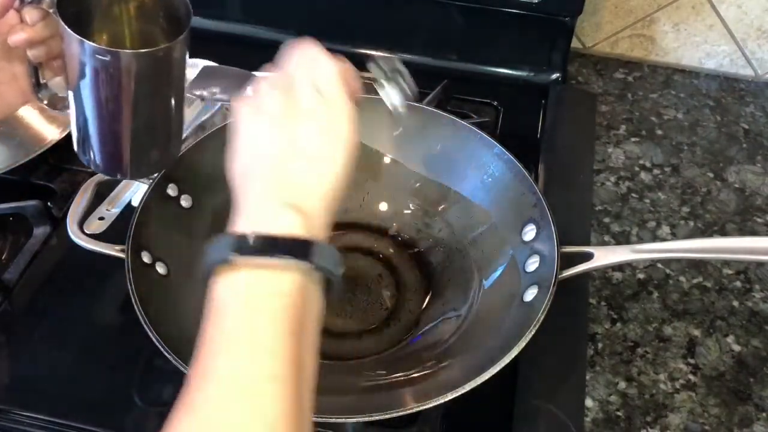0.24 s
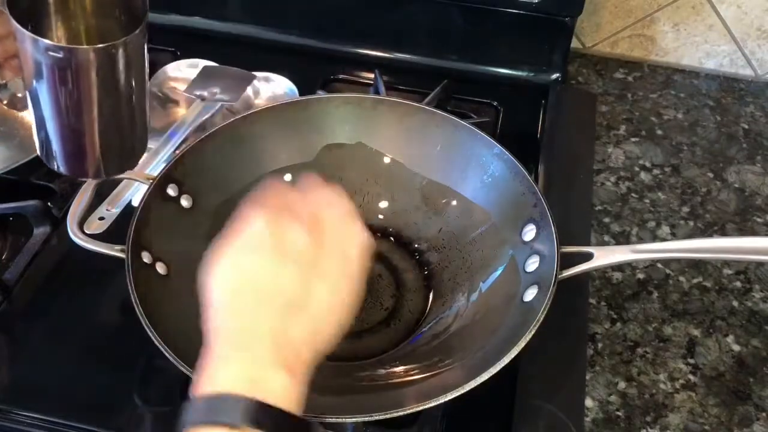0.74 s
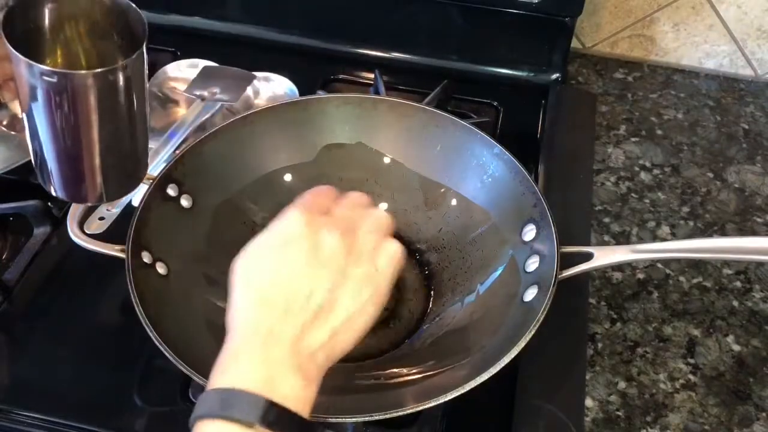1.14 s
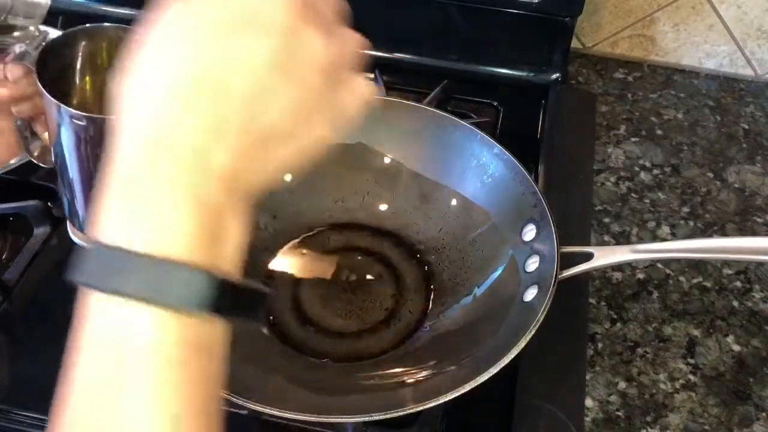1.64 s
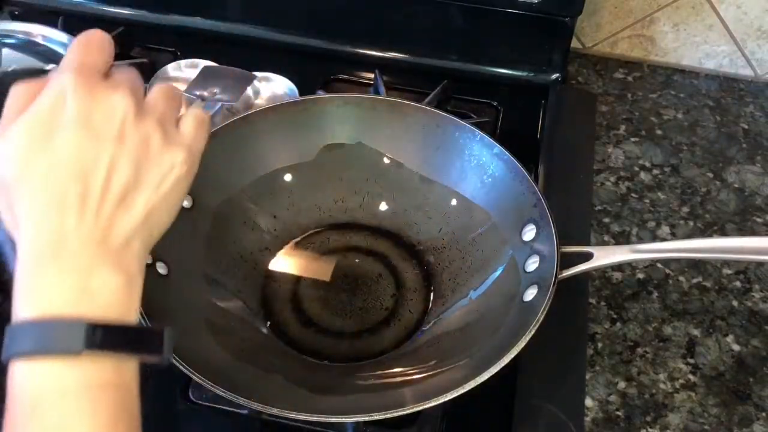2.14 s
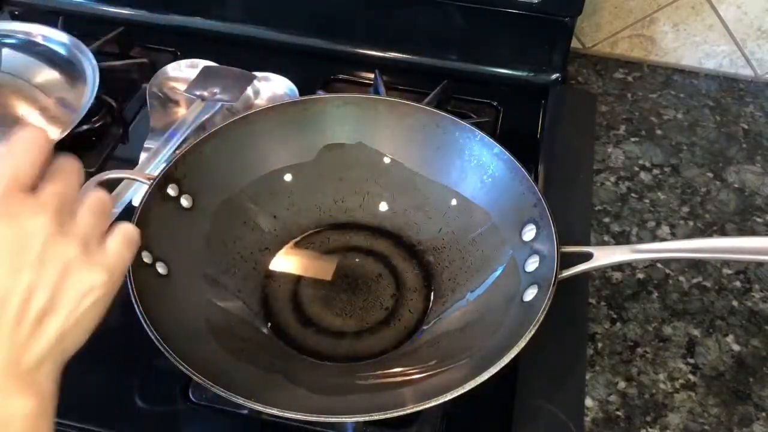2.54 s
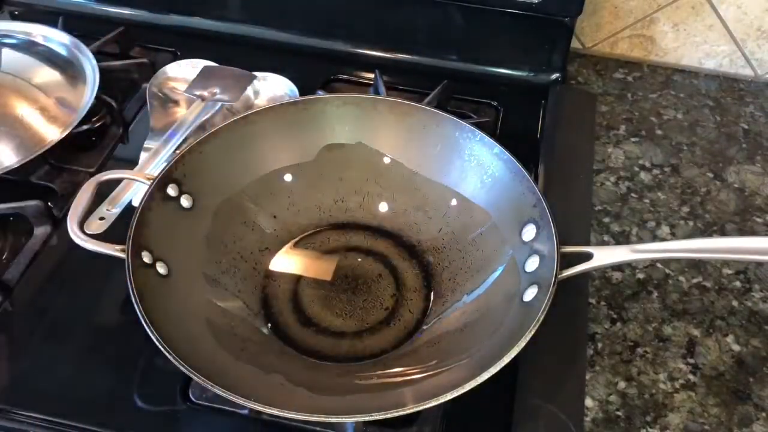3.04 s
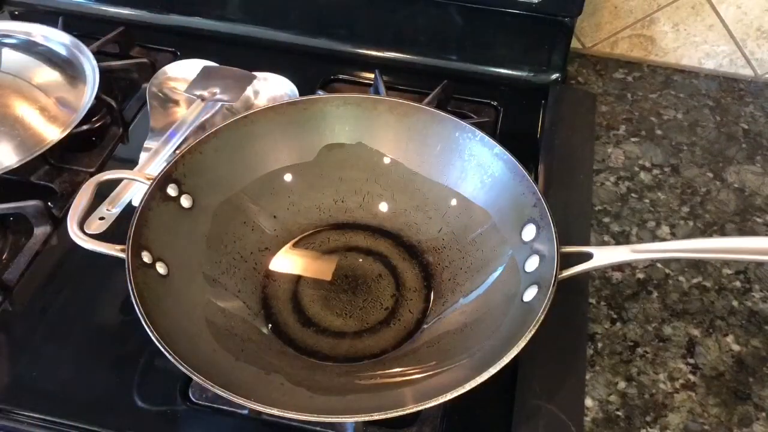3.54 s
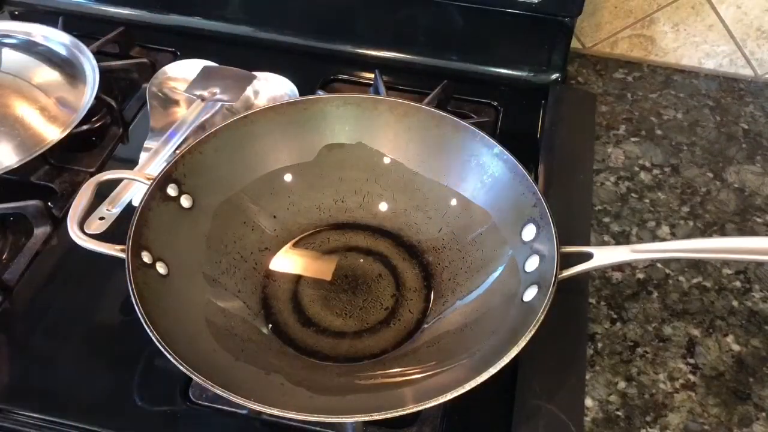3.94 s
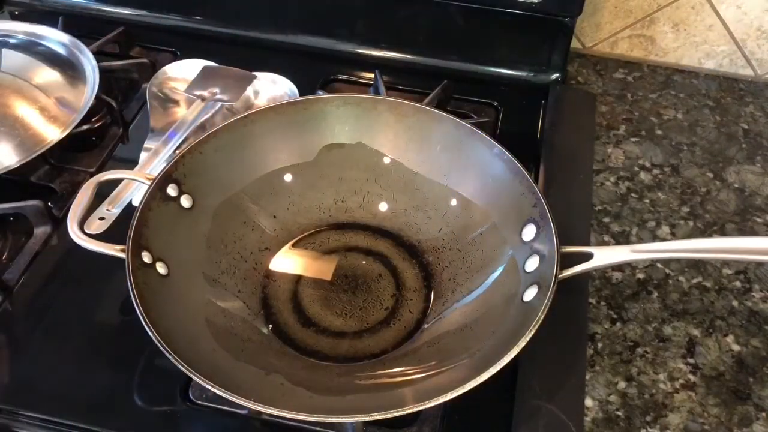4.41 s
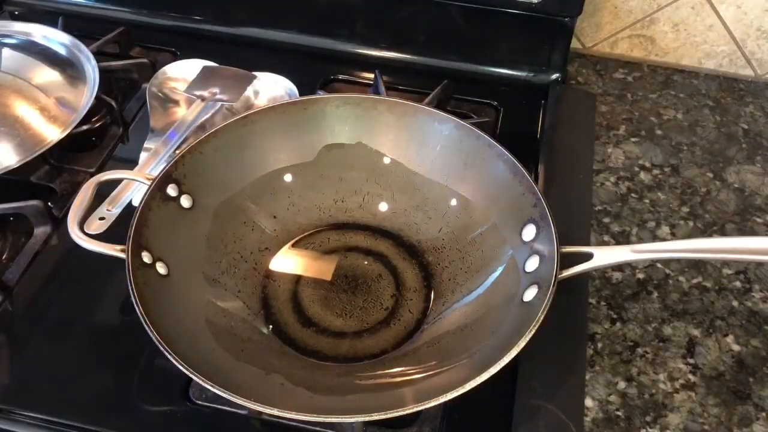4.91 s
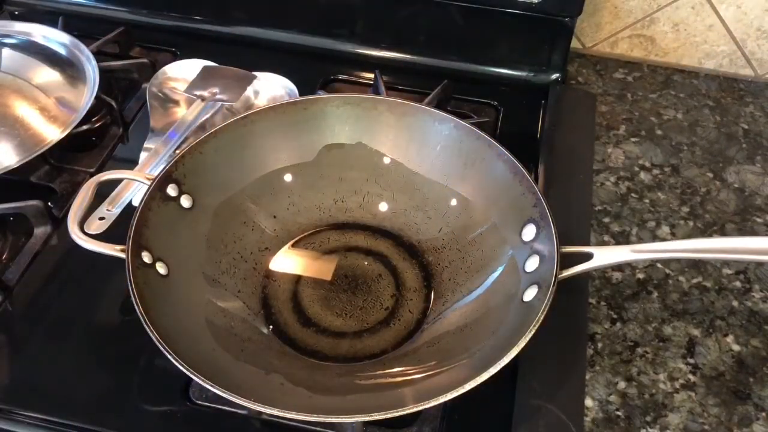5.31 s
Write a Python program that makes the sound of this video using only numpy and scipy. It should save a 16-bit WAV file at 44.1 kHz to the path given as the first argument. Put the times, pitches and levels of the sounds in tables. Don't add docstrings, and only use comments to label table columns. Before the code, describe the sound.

From 0 to 2.4 s there is only a quiet kitchen: low rumble, a wavering motor hum around 85 Hz creeping slightly upward, a steady mains buzz, faint electronic whine and soft hiss. At 2.42 s a steel base lightly touches the stove and scrapes with brief singing tones. At 2.52 s it lands hard, a damped clank with a hollow stove-top knock, and at 2.54 s bounces with the loudest, brightest clang, ringing about half a second. Soft rubbing and small clicks come near 2.9 s. At 3.18 s a second, weaker clink with quick rebounds rings, followed by scraping. At 3.5 s a light spoon tap; from 3.67 to 4.0 s dry, choked rattles and dull rubs. Faint metallic hisses fade through 4.3-4.7 s. A sharp tiny tick at 4.81 s, a soft double tick at 5.33 s and a last at 5.5 s close over the hum. Close mono microphone, short tail.

```python
import sys
import numpy as np
from scipy import signal
from scipy.fft import rfft, irfft, next_fast_len
from scipy.io import wavfile
from scipy.ndimage import map_coordinates

SR = 44100
rng = np.random.default_rng(int(sys.argv[2]) if len(sys.argv) > 2 else 0)


def wav_out(sig):
    wavfile.write(sys.argv[1], SR, np.round(np.clip(np.atleast_2d(sig).T, -1, 1) * 32767).astype(np.int16))


def to_linear_factor(level_db):
    exponent = np.asarray(level_db, float) / 20
    return 10 ** exponent


N = 245637


def unit(x):
    return x / np.sqrt(np.mean(x ** 2) + 1e-20)


def along(points, hz):
    point_hz, value = np.transpose(points)
    return np.interp(np.log(hz + 1), np.log(point_hz + 1), value)


def wobble(rate):
    knots = rng.standard_normal(int(N * rate / SR) + 4)
    return map_coordinates(knots, [np.arange(N) * rate / SR])


def filtered(x, gain):
    size = next_fast_len(x.shape[-1])
    spectrum = rfft(x, size) * gain(np.fft.rfftfreq(size, 1 / SR))
    return irfft(spectrum, size)[..., :x.shape[-1]]


def noise(gain):
    return unit(filtered(rng.standard_normal(N), gain))


def humps(peaks, f):
    power = 0
    for hz, width, db in peaks:
        power = power + to_linear_factor(db) ** 2 / width / (1 + (2 * (f - hz) / width) ** 2) ** 2
    return np.sqrt(power)


def narrow(peaks):
    total = np.linalg.norm(to_linear_factor([db for _, _, db in peaks]))
    return total * noise(lambda f: humps(peaks, f))


def hump(t, crest, rise, fall):
    return np.sin(np.pi / 2 * np.interp(t, [crest - rise, crest, crest + fall], [0, 1, 0])) ** 2


def swells(rows, column):
    t = np.arange(N) / SR
    return sum(to_linear_factor(row[column]) * hump(t, *row[:3]) for row in rows)


def dying(gain, t60_of, size):
    hz, t, z = signal.stft(rng.standard_normal(size), SR, nperseg=256, noverlap=192)
    hz = hz[:, None] + 1
    fading = z * gain(hz) * to_linear_factor(-60 * t / t60_of(hz))
    tail = signal.istft(fading, SR, nperseg=256, noverlap=192)[1][:size]
    return tail / np.linalg.norm(tail)


# crest in seconds, rise in seconds, fall in seconds, level in dB.
MOTOR_SWELLS = [
    (0.01, .3, 0.77, -69.5),
    (1.1, 0.6, 0.3, -68),
    (1.85, 0.37, 0.27, -65),
    (2.8, 1.8, 0.74, -67.5),
    (5.1, 0.73, 0.95, -69.5),
]


def motor():
    start_hz, climb_hz, creep_power = 84, 11, 1.5
    steady_db = -89
    pitch = start_hz + climb_hz * (np.arange(N) / N) ** creep_power + 3.64 * wobble(10)
    level = (to_linear_factor(steady_db) + swells(MOTOR_SWELLS, column=3)) * to_linear_factor(1.6 * wobble(7.2))
    return np.sqrt(2) * level * np.sin(2 * np.pi * np.cumsum(pitch) / SR)


# pitch in Hz, width in Hz, level in dB.
BUZZ = [(57.4, 5, -74), (130.5, 12, -78), (239.4, 5.3, -75), (385, 81, -86)]
# pitch in Hz, width in Hz, level in dB.
WHINE = [(2930, 98, -87), (3267, 170, -88), (4060, 220, -88.5), (4310, 160, -87), (4600, 37, -90.5),
         (7900, 130, -101), (8910, 110, -88), (13880, 310, -90)]


def electric():
    mains_hz, mains_db = 360.3, -73
    level = to_linear_factor(mains_db + 0.99 * wobble(2.75))
    mains = np.sqrt(2) * level * np.sin(2 * np.pi * mains_hz * np.arange(N) / SR)
    return mains + narrow(BUZZ) + narrow(WHINE)


# frequency in Hz, level in dB per Hz.
AIR = [(15, -63), (25, -27), (39, -14.5), (84, -0.5), (113, -9), (206, -10.5), (236, -9), (327, -11),
       (362, -11), (388, -11.5), (415, -11), (1500, -33), (1950, -31.5), (3300, -120)]
# frequency in Hz, level in dB per Hz.
HISS = [(500, -2), (1200, -3.5), (2500, -5.5), (5000, -10.5), (8500, -12), (9500, -15), (12000, -17),
        (13200, -13.5), (15700, -15.5)]
# crest in seconds, rise in seconds, fall in seconds, level in dB.
STIR = [
    (3.3, 1.7, 2.6, -82.5),
    (5.57, 0.27, .45, -83),
]


def kitchen_air():
    rumble_db, sway_db, hiss_db = -63.05, 0.8, -71.5
    rumble = to_linear_factor(rumble_db + sway_db * wobble(3.27)) * noise(lambda f: to_linear_factor(along(AIR, f)))
    hiss = (to_linear_factor(hiss_db) + swells(STIR, column=3)) * noise(lambda f: to_linear_factor(along(HISS, f)))
    return rumble + hiss + motor() + electric()


BASE_HZ = [2230, 2355, 3470, 4290, 5535, 7545, 8250, 9200, 11250, 12120, 13030, 15280]
# crest in seconds, rise in seconds, fall in seconds, dull rub in dB, bright rub in dB.
SLIDES = [(2.435, 0.0177, 0.06, -75, -64), (2.507, 0.061, 0.0078, -66, -55.5),
          (2.56, 0.018, 0.04, -61, -57), (2.64, .06, 0.14, -63, -66), (2.93, 0.058, 0.076, -73, -67),
          (3.235, 0.04, 0.035, -58.5, -63), (3.27, .02, .03, -76, -68), (3.3, .012, 0.016, -74, -72),
          (3.333, 0.013, .02, -72, -69), (3.39, .05, 0.037, -70, -75), (3.632, 0.104, 0.035, -86, -69),
          (3.672, 0.0094, 0.031, -77, -84.5), (3.72, 0.071, 0.13, -64, -73),
          (3.835, 0.055, 0.03, -59.5, -70), (3.878, 0.062, 0.019, -60, -72),
          (3.982, 0.0063, 0.037, -64, -85), (4.274, 0.073, 0.23, -101, -69.5),
          (4.48, 0.061, 0.28, -92, -74), (4.652, 0.033, 0.205, -79, -78.5)]
# frequency in Hz, level in dB.
RUB_DULL = [(500, 5.5), (1000, 4.5), (1600, -2), (3500, -11), (6000, -10), (9000, -15.5)]
# frequency in Hz, level in dB.
RUB_BRIGHT = [(4000, -6), (6500, -7), (8500, -4), (13000, -4.5), (15500, -0.5)]


def slides():
    grit = to_linear_factor(0.86 * wobble(300) + 1.9 * wobble(65))
    base = [(hz, 110, 0) for hz in BASE_HZ]

    def steel(f):
        return 1 + 14 * humps(base, f)

    dull = unit(grit * noise(lambda f: steel(f) * to_linear_factor(along(RUB_DULL, f))))
    bright = unit(grit * noise(lambda f: steel(f) * to_linear_factor(along(RUB_BRIGHT, f))))
    return swells(SLIDES, column=3) * dull + swells(SLIDES, column=4) * bright


SUNG_S = [2.428, 2.43, 2.435, 2.445, 2.466, 2.465, 2.466, 2.495, 2.5, 2.49, 2.505, 2.509, 2.89, 2.922,
          2.942, 2.932, 2.925, 3.398, 3.508, 3.803, 3.8, 3.82, 3.838, 3.84, 3.84, 3.877, 3.972, 3.97, 4.809,
          4.811, 5.335, 5.349, 5.35, 2.8, 2.56, 2.57, 3.208, 3.237, 3.425, 4.82, 3.52, 3.772, 3.876, 3.53,
          3.25, 3.26, 2.655, 3.69, 3.235, 3.23, 2.56, 2.57, 2.57, 3.555, 3.976]
SUNG_HZ = [3470, 2355, 985, 9200, 5535, 15280, 12120, 13050, 11250, 3470, 4290, 2200, 5510, 5510, 5510,
           13050, 6800, 975, 580, 585, 1950, 970, 5550, 6800, 1540, 3600, 825, 2900, 14000, 9400, 2950, 340,
           560, 5505, 4278, 5155, 730, 650, 570, 340, 5548, 5500, 5500, 3250, 4900, 1750, 825, 2900, 5697,
           3030, 4120, 2272, 3422, 2900, 2700]
# rise in seconds, fall in seconds, level in dB.
SUNG_SHAPE = [(0.011, 0.018, -61), (0.012, 0.014, -68), (0.01322, 0.056, -60), (.015, .02, -73),
              (.006, .03, -65), (.003, .012, -61), (.003, .012, -72), (.025, .02, -69), (.02, .015, -72),
              (.012, 0.012, -63), (0.015, 0.022, -63), (0.0032, 0.0092, -53), (0.023, .015, -76),
              (0.0095, .012, -77), (.012, .012, -70), (.02, .01, -80), (0.016, .012, -76),
              (0.034, 0.067, -67.5), (0.012, 0.012, -48.5), (.03, 0.014, -52), (.015, .012, -72),
              (.02, 0.06, -62.5), (.015, 0.026, -70), (.02, 0.033, -74), (0.021, 0.016, -64),
              (.004, .007, -65), (0.00586, 0.0066, -55.5), (.003, 0.004, -62), (.002, .003, -66),
              (0.0022, 0.0057, -70), (0.0054, .008, -76), (0.0102, 0.031, -62), (0.025, .02, -68),
              (.06, 0.045, -73), (0.014, 0.048, -49), (.02, 0.063, -58), (0.0083, .008, -50),
              (0.014, .012, -47), (0.045, 0.04, -68), (.04, 0.033, -65), (0.0078, .02, -70),
              (.004, .015, -75), (.004, .006, -71), (.015, .02, -70), (0.022, .03, -63), (0.017, .02, -72),
              (.02, 0.024, -55), (.01, .015, -72), (0.013, 0.023, -64), (0.0071, 0.025, -64),
              (.012, .03, -60), (0.023, 0.045, -56), (.015, 0.036, -60), (.02, 0.033, -63.5),
              (.004, .008, -64)]


def singing():
    out = np.zeros(N)
    waver = 0.0042 * wobble(90)
    for crest, hz, (rise, fall, db) in zip(SUNG_S, SUNG_HZ, SUNG_SHAPE):
        k = np.arange(round((crest - rise) * SR), round((crest + fall) * SR))
        tone = np.sin(2 * np.pi * hz * np.cumsum(1 + waver[k]) / SR)
        out[k] += np.sqrt(2) * to_linear_factor(db) * hump(k / SR, crest, rise, fall) * tone
    return out


# start in seconds, peak in dB.
SNAPS = [
    (2.5177, -26),
    (3.5032, -45),
    (3.824, -47),
    (3.8343, -48),
    (3.8378, -49),
    (3.849, -52),
    (3.8862, -50),
    (3.965, -51),
    (3.97, -47),
]


def snaps():
    swing_hz, t60_s = 2600, 0.0013
    out, t = np.zeros(N), np.arange(SR // 200) / SR
    for s, db in SNAPS:
        swing = to_linear_factor(db + 4 - 60 * t / t60_s) * np.sin(2 * np.pi * swing_hz * t)
        out[round(s * SR):][:len(t)] -= swing
    return out


def ringing(hz, modes, t, damping):
    db, t60 = np.transpose(modes)
    hz = np.array(hz)
    decay = np.log(1000) / np.clip(t60 / damping, .01, .9)
    split_hz = 0.002 * hz * rng.uniform(-0.75, 1, len(hz))
    twin = 1 + 0.33 * np.exp(2j * np.pi * np.outer(split_hz, t))
    early = 1 + to_linear_factor(-3.5 - 60 * t / 0.08)
    return hz, db, twin * early * np.exp(np.outer(2j * np.pi * hz - decay, t))


def strike(body, tilt_db, lag):
    hz, db, waves = body
    level = db + tilt_db * np.log2(hz / 4000) + 1.5 * rng.standard_normal(len(hz))
    return np.imag(to_linear_factor(level) * np.exp(-2j * np.pi * hz * lag) @ waves)


STOVE_HZ = [385, 573, 592, 652, 663, 714, 737, 790, 809, 832, 863, 895, 944, 985, 824, 1780]
# frequency in Hz, time to fall by 60 dB in seconds.
KITCHEN = [(300, 0.097), (1000, 0.72), (3000, 0.76), (8000, 0.41), (15000, 0.1)]


def blows(contacts, steel_hz, steel, stove, clatter_db, clatter_s, wash_db, room_db, lag, damping=1):
    t = np.arange(int(.6 * SR)) / SR
    first = round(contacts[0][0] * SR) - 200
    dry = np.zeros(2 * SR)
    thin = ringing(steel_hz, steel, t, damping)
    hollow = ringing(STOVE_HZ, stove, t, damping)
    crowds = [(hz, 260, db) for hz, (db, _) in zip(steel_hz, steel)] + [(6000, 63000, wash_db)]
    steel_attack = 1 - np.exp(-t / .0006)
    knock_attack = np.sin(np.pi / 2 * np.clip(t / lag, 0, 1)) ** 2

    for s, steel_db, knock_db, crack_db, tilt_db in contacts:
        def slope(hz):
            return to_linear_factor(tilt_db * np.log2(hz / 4000)) / (1 + (700 / hz) ** 4)

        knock = strike(hollow, 0, lag) * knock_attack
        ring = strike(thin, tilt_db, 0) * steel_attack
        sound = to_linear_factor(steel_db - 12.0) * ring + to_linear_factor(knock_db - 7.0) * knock
        sound[:2048] += to_linear_factor(crack_db + 17.5) * dying(slope, lambda hz: .015, size=2048)
        clatter = dying(lambda hz: slope(hz) * humps(crowds, hz),
                        lambda hz: clatter_s * (4000 / hz) ** 0.22, size=SR // 4)
        sound[:SR // 4] += to_linear_factor(crack_db + clatter_db) * clatter
        dry[round(s * SR) - first:][:len(t)] += sound

    tail = dying(lambda hz: 1, lambda hz: along(KITCHEN, hz), len(t))
    echo = signal.fftconvolve(np.pad(dry, (250, 0)), tail)[:len(dry)]
    return np.pad(dry + to_linear_factor(room_db) * echo, (first, N))[:N]


# start in seconds, steel ring in dB, hollow knock in dB, crack in dB, brightness in dB per octave.
TICKS = [
    (4.8085, -83, -98, -67, 0.5),
    (5.3285, -66, -75, -80, 3),
    (5.333, -60, -89, -73, -2),
    (5.505, -78, -82, -77, 3),
]
RIM_HZ = [5250, 7310, 8820, 10100, 10800, 13200, 15500]
# strength in dB, time to fall by 60 dB in seconds.
RIM = [(2, 0.027), (3, 0.026), (-5, .03), (1, 0.033), (-4, .03), (-6, .03), (5, 0.033)]
# strength in dB, time to fall by 60 dB in seconds.
STOVE_SIDE = [(-23, .1), (0, 0.071), (0, 0.062), (-11, 0.057), (-7, 0.108), (-41, 0.078), (-3, 0.21),
              (-23, 0.11), (-23, 0.081), (-2, 0.24), (-21, 0.076), (9.5, 0.084), (-41.5, 0.056),
              (7.5, 0.17), (-18, 0.032), (-18, 0.033)]


def ticks():
    return blows(TICKS, RIM_HZ, RIM, STOVE_SIDE, clatter_db=28.5, clatter_s=0.045,
                 wash_db=26.0, room_db=-5.0, lag=.002)


# start in seconds, steel ring in dB, hollow knock in dB, crack in dB, brightness in dB per octave.
TAPS = [
    (3.4935, -79, -65, -60, -12),
    (3.4990, -51, -69, -55.5, 1),
    (3.503, -80, -64.5, -61, 12),
    (3.514, -66, -58.5, -57, -4),
]
SPOON_HZ = [1367, 1520, 2357, 2779, 2869, 2902, 3247, 3465, 3582, 3725, 4360, 4892, 5135, 5548, 6064, 6790,
            6957, 7790, 8031, 13969, 15257]
# strength in dB, time to fall by 60 dB in seconds.
SPOON = [(-20, 0.8), (-14, 0.48), (-13, 0.692), (-10, 0.3), (-5, 0.94), (-10, 0.5), (-3, 0.28), (-3, 0.25),
         (-9, 0.73), (-15, 0.4), (-7.5, 0.43), (-4, 0.12), (-7, 0.48), (0.5, 0.19), (-4, 0.108),
         (-16.6, 0.565), (-9, 0.16), (-14, 0.206), (-5, 0.193), (-9, 0.167), (-19.1, 0.8)]


def taps():
    return blows(TAPS, SPOON_HZ, SPOON, STOVE_SIDE, clatter_db=27.0, clatter_s=0.14,
                 wash_db=8, room_db=-14.5, lag=.0035, damping=1.3)


# start in seconds, steel ring in dB, hollow knock in dB, crack in dB, brightness in dB per octave.
RATTLE = [
    (3.670, -82, -88, -67.5, -7.5),
    (3.768, -68, -77, -82, 7),
    (3.8235, -60, -61.5, -66, -4),
    (3.834, -67, -78.5, -75, 4.5),
    (3.872, -68, -77, -69.5, -7),
    (3.885, -84.5, -84, -66, -14),
    (3.9645, -81, -63.5, -68, -17),
    (3.9685, -59, -69, -63.5, -7),
    (3.998, -82, -73, -84, -3.5),
]
# strength in dB, time to fall by 60 dB in seconds.
STOVE_BACK = [(-8.5, 0.38), (-20, 0.25), (0, 0.39), (-14, 0.35), (-25, 0.14), (-9, 0.15), (1, 0.12),
              (-27, 0.13), (-27, 0.21), (-11, 0.2), (-11, 0.11), (-22, 0.13), (-5, 0.13), (-7, 0.17),
              (18, 0.01045), (0, 0.023)]


def rattle():
    return blows(RATTLE, SPOON_HZ, SPOON, STOVE_BACK, clatter_db=29.5, clatter_s=0.0273,
                 wash_db=16, room_db=-3.5, lag=.0018, damping=9.2)


# start in seconds, steel ring in dB, hollow knock in dB, crack in dB, brightness in dB per octave.
NUDGE = [
    (3.1772, -46.5, -36.5, -40.5, -1.5),
    (3.1815, -57, -46, -46, 2),
    (3.2065, -55, -50, -64, 2),
    (3.2295, -65, -55, -60, 6),
    (3.2345, -75, -55, -63, -4),
    (3.331, -82, -75, -65, -11),
]
LADLE_HZ = [1680, 1920, 2790, 2950, 3145, 3375, 3572, 3652, 4190, 4274, 4850, 4942, 5125, 5465, 5545, 5655,
            5755, 6775, 7035, 7738, 8005, 8365, 8551, 9270, 10010, 13588, 14040, 15280]
# strength in dB, time to fall by 60 dB in seconds.
LADLE = [(-35, 0.1), (-4, 0.11), (-1, 0.17), (-8, .4), (-2, 0.27), (-11, 0.54), (0, 0.44), (-6, 0.46),
         (1.5, 0.18), (-8, .2), (-8, 0.58), (-5, 0.77), (-9, .3), (12, 0.044), (4, 0.12), (-21, .5),
         (3, .2), (2.5, 0.47), (-1, .15), (-20, .2), (2, 0.16), (-5, .18), (-1, .22), (-2, 0.17),
         (-9, 0.49), (-24, .3), (-3, .04), (-6, .06)]


def nudge():
    return blows(NUDGE, LADLE_HZ, LADLE, STOVE_BACK, clatter_db=28.5, clatter_s=0.051,
                 wash_db=10.0, room_db=-15.5, lag=.003, damping=1.17)


# start in seconds, steel ring in dB, hollow knock in dB, crack in dB, brightness in dB per octave.
TOUCH = [
    (2.4185, -67, -56, -55, -5.5),
    (2.4273, -63, -56.5, -69, -1),
    (2.4635, -77, -80, -65, -1),
    (2.4765, -68, -73, -57, -3),
    (2.5065, -62, -74, -58, 8),
    (2.918, -75, -74, -59, -6),
    (2.934, -80, -69.5, -72, 6),
]
# strength in dB, time to fall by 60 dB in seconds.
BASE = [(-11, 0.056), (-2, 0.094), (-2, 0.13), (-17, .1), (3, 0.1211), (-11, .1), (-11, 0.087), (-8, .12),
        (-9.5, 0.093), (-18.5, 0.097), (-13.5, .12), (-3, 0.097)]
# strength in dB, time to fall by 60 dB in seconds.
STOVE_TOUCH = [(-24.5, .1), (-21, .1), (-19, .1), (-14, 0.18), (-14, .19), (-16, .2), (-0.5, 0.13),
               (-6, 0.18), (-15, .2), (-17, .2), (-5.5, 0.37), (-25.5, .2), (-61, .2), (-1.5, 0.5),
               (-13, .03), (-19.5, 0.01988)]


def touch():
    return blows(TOUCH, BASE_HZ, BASE, STOVE_TOUCH, clatter_db=20.5, clatter_s=0.071,
                 wash_db=22.0, room_db=-3.5, lag=.0033)


# start in seconds, steel ring in dB, hollow knock in dB, crack in dB, brightness in dB per octave.
BOUNCE = [
    (2.5388, -30.5, -45, -27.5, 0.0023),
    (2.5445, -59.5, -45, -60, 0),
]
JUG_HZ = [1402, 1491, 2107, 2168, 2227, 2353, 2587, 2822, 2866, 2951, 2997, 3500, 3543, 3865, 4278, 5155,
          5504, 5527, 5645, 6800, 7410, 7535, 8790, 9232, 9528, 10042, 11129, 12020, 12793, 13057, 13668,
          14926, 15290]
# strength in dB, time to fall by 60 dB in seconds.
JUG = [(-17.2, 1), (-22, 0.86), (-19.5, 0.25), (-2, 0.23), (-6, 0.336), (-6.5, 0.58), (-18, 0.3), (-7, 0.4),
       (-9, 0.49), (-23, 0.3), (-15, 0.62), (-12, 0.73), (-13, 0.31), (-12, 0.43), (-14, 0.3), (-35, 0.39),
       (-12, 0.96), (-5.5, 0.49), (-2, 0.21), (-30, 0.6), (-5, 0.3), (-7, 0.33), (-19, 0.225), (-18, 0.379),
       (-10, 0.45), (-17, 0.17), (0.5, 0.082), (-11, 0.22), (-9, 0.22), (-4, 0.2), (1, 0.131),
       (-25.7, 0.255), (-18, 0.457)]
# strength in dB, time to fall by 60 dB in seconds.
STOVE_FREE = [(-17, .04), (-12, .05), (-24, .2), (-3, .4), (5, .7), (-20, .2), (-3, .4), (-27, .2),
              (5, 0.79), (-7, .9), (-15, .2), (5, .45), (-2, .45), (8.5, 0.59), (10, .07), (8, .016)]


def bounce():
    return blows(BOUNCE, JUG_HZ, JUG, STOVE_FREE, clatter_db=23, clatter_s=0.13,
                 wash_db=12, room_db=-14, lag=.004, damping=1.45)


# start in seconds, steel ring in dB, hollow knock in dB, crack in dB, brightness in dB per octave.
LANDING = [
    (2.5143, -55.5, -68, -39.5, -4),
    (2.5170, -35.5, -34, -32, -4.5),
    (2.5203, -50, -42, -38, 8.5),
]
# strength in dB, time to fall by 60 dB in seconds.
JUG_PRESSED = [(0.5, 0.038), (2, 0.044), (-10, 0.029), (-7, 0.041), (-3, 0.045), (3, 0.06), (-4, 0.055),
               (5.5, 0.035), (-3.5, 0.06), (-5, 0.046), (-3, 0.066), (2.5, 0.055), (9, 0.087), (-2, 0.066),
               (-4, 0.23), (-14, 0.06), (-2, 0.046), (1, 0.052), (-3, 0.13), (3.5, 0.038), (-8, 0.06),
               (5, 0.074), (5, 0.054), (-14.4, 0.06), (5, 0.066), (-4, 0.049), (3, 0.066), (-2, 0.05),
               (-3.9, 0.06), (-2, 0.06), (-1, 0.06), (-4, 0.06), (4, 0.06)]
# strength in dB, time to fall by 60 dB in seconds.
STOVE_FRONT = [(-5, .04), (6.5, 0.035), (-23, 0.2), (-22, 0.27), (-0.5, 0.31), (-40, 0.18), (-6.5, 0.51),
               (-27.5, 0.22), (5, 0.57), (-21, 0.083), (2, 0.06), (-2, 0.12), (4.5, 0.048), (0.5, 0.46),
               (15.5, 0.0693), (13, 0.016)]


def landing():
    return blows(LANDING, JUG_HZ, JUG_PRESSED, STOVE_FRONT, clatter_db=20, clatter_s=0.11,
                 wash_db=19, room_db=-18, lag=.004)


def scene():
    metal = ticks() + taps() + rattle() + nudge() + touch() + bounce() + landing()
    metal = filtered(metal, lambda f: 1 - 1 / (1 + (f / 380) ** 6))
    return (kitchen_air() + slides() + singing() + snaps() + metal)[None]


# crest in seconds, rise in seconds, fall in seconds, level in dB.
TOP_OPENS = [
    (2.419, .004, .008, -8),
    (2.517, .008, .012, -18),
    (2.54, .004, .01, -30.5),
    (3.178, .004, .006, -19),
    (4.809, .003, .003, -14),
]


def band_limit(dry):
    limited = filtered(dry, lambda f: f < 15760)
    return limited + swells(TOP_OPENS, column=3) * (dry - limited)


def top_cut(x):
    return signal.sosfilt(signal.butter(12, 16650, fs=SR, output="sos"), x)


def record(dry):
    mix = band_limit(dry)
    return top_cut(mix)


dry = scene()
out = record(dry)
wav_out(out)
```